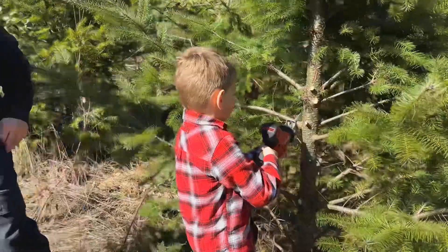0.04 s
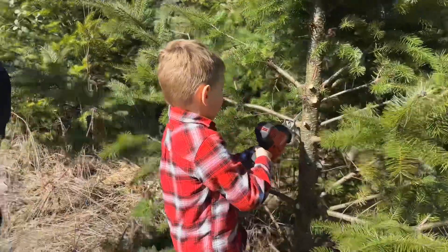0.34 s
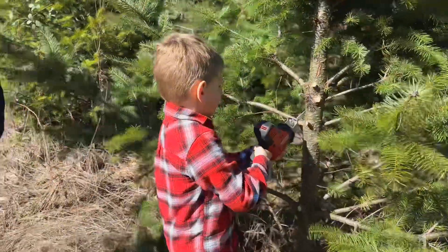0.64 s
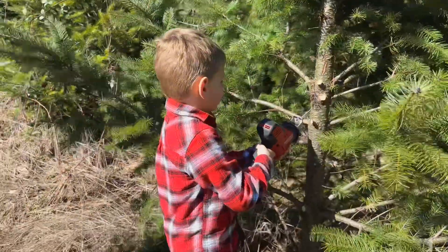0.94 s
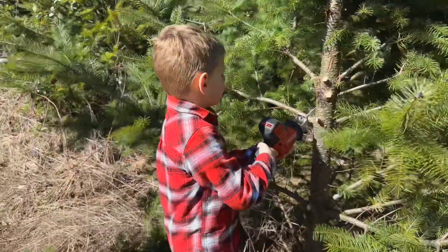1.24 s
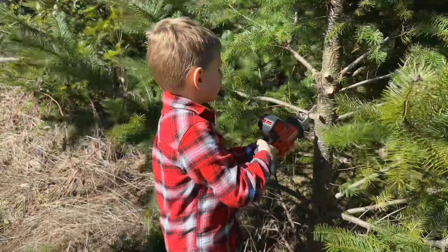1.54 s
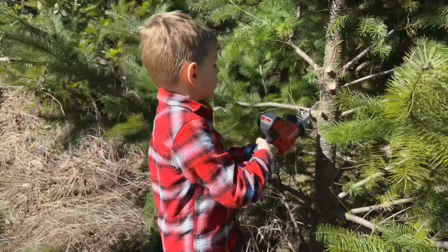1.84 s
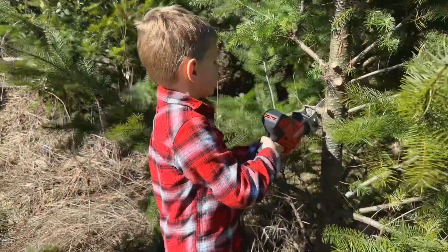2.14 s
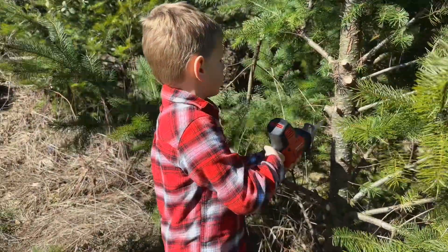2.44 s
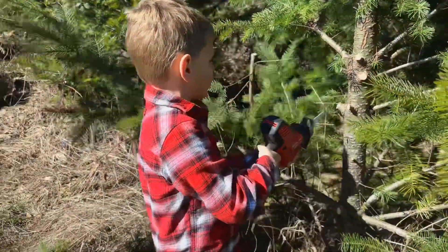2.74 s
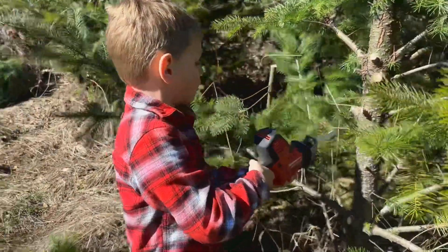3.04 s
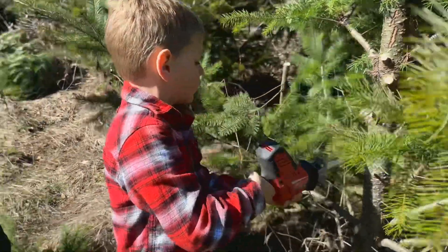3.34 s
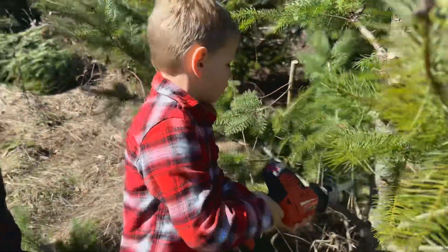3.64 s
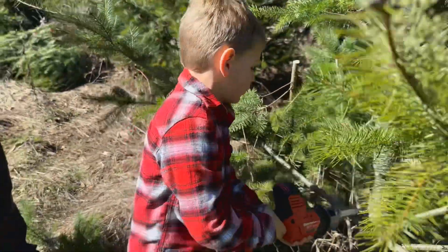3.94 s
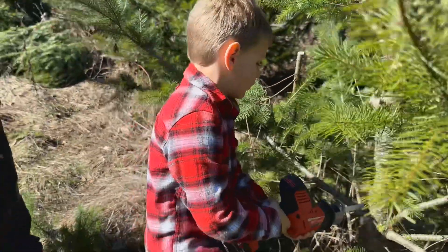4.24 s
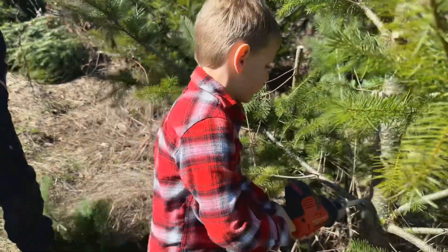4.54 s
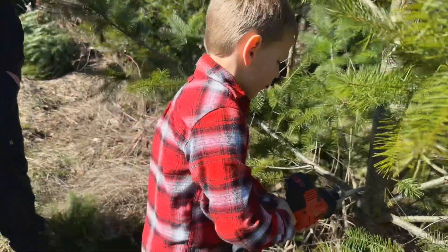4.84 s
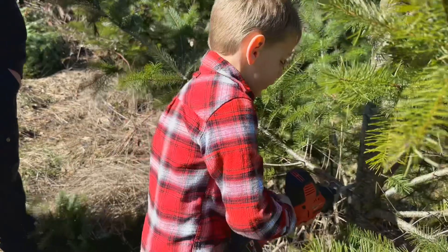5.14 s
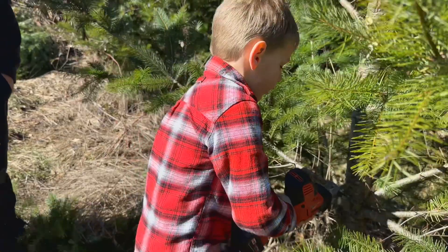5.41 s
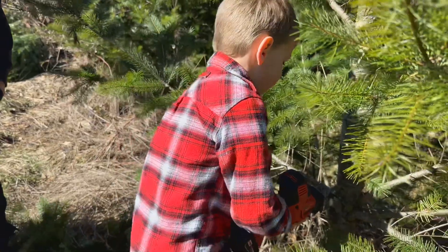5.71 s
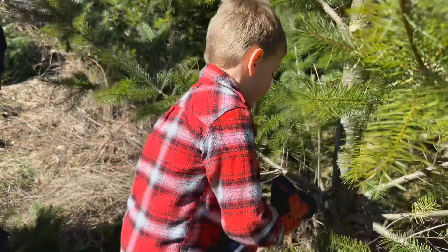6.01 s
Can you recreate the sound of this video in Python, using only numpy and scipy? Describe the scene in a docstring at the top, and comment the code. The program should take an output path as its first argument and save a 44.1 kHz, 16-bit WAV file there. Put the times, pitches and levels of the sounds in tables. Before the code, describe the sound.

A small cordless chainsaw whirs and rattles outdoors, coasts to a stop, then starts again after chain clacks and rustling fir needles.

```python
"""Among fir trees, in light wind, a small cordless chainsaw runs against limbs, coasts to a stop, is
lowered through the needles and starts again. Its slack chain slaps the bar, hardest twice per sprocket
turn, over a rattle of links and a motor hum; the blows ring in the housing. In the pause the loose chain
clacks, the bar rings faintly, needles brush past and something bumps softly near the microphone."""
import sys
import numpy as np
from scipy import signal
from scipy.fft import rfft, irfft, next_fast_len
from scipy.io import wavfile
from scipy.ndimage import map_coordinates

SR = 44100
rng = np.random.default_rng(int(sys.argv[2]) if len(sys.argv) > 2 else 0)


def master_out(mix):
    """Clip the mix to full scale and print it as 16-bit PCM to the path in sys.argv[1]."""
    frames = np.transpose(np.atleast_2d(mix))
    ceiling = np.clip(frames, -1, 1)
    pcm = np.round(ceiling * 32767).astype(np.int16)
    wavfile.write(sys.argv[1], SR, pcm)


N = 267628
TIME = np.arange(N) / SR


def amp(db):
    """Decibels to gain."""
    return 10 ** (np.asarray(db) / 20)


def unit(x):
    """Scaled to rms 1."""
    return x / np.sqrt(np.mean(x ** 2) + 1e-20)


def along(points, hz):
    """Curve of (frequency [Hz], value) points, read on a log frequency axis."""
    knots_hz, values = np.transpose(points)
    return np.interp(np.log(hz + 1), np.log(knots_hz + 1), values)


def wobble(knots_per_s):
    """Smooth random curve."""
    knots = rng.standard_normal(int(N * knots_per_s / SR) + 4)
    return map_coordinates(knots, [TIME * knots_per_s])


def coloured(x, spectrum, resonances=(), size=8192):
    """Minimum-phase filter of unit energy: a broad spectrum plus resonance peaks."""
    hz = np.fft.rfftfreq(size, 1 / SR)
    peaks_db = sum(db / (1 + (2 * (hz - centre) / width) ** 2) for centre, width, db in resonances)
    cepstrum = irfft(np.log(amp(along(spectrum, hz) + peaks_db) + 1e-6))
    cepstrum[1:size // 2] *= 2
    cepstrum[size // 2 + 1:] = 0
    response = irfft(np.exp(rfft(cepstrum)))
    return signal.fftconvolve(x, response / np.linalg.norm(response))[:N]


def lowpass(x, hz, order=1):
    """Butterworth low-pass."""
    return signal.sosfilt(signal.butter(order, hz, fs=SR, output="sos"), x)


def resonant(x, hz, q):
    """One resonance, gain 1 at its centre."""
    return signal.lfilter(*signal.iirpeak(hz, q, fs=SR), x)


def impulses(times_s, sizes):
    """One-sample pushes."""
    samples = np.clip(np.round(times_s * SR).astype(int), 0, N)
    return np.bincount(samples, sizes, N + 1)[:N]


def chatter(times_s, sizes, t60_s):
    """Each contact buzzes in a decaying noise burst with the energy of its push."""
    decay = amp(-120 / (t60_s * SR))
    power = signal.lfilter([1 - decay], [1, -decay], impulses(times_s, sizes ** 2))
    return np.sqrt(power) * rng.standard_normal(N)


def stereo(mid, side):
    """Mid and side to left and right."""
    return np.array([mid + side, mid - side])


def stereo_noise(spectrum, side_db):
    """Coloured stereo noise, rms 1."""
    mid, side = (coloured(rng.standard_normal(N), spectrum) for _ in range(2))
    return unit(stereo(mid, amp(side_db) * side))


# Tree hush: (frequency [Hz], gain [dB])
HUSH_SPECTRUM = [(60, -22), (200, 1), (500, -0.5), (1000, -1.5), (2000, -10), (4000, -13.5), (16000, -17.5)]


def trees():
    """Faint, steady hush of trees."""
    return amp(-67.5) * stereo_noise(HUSH_SPECTRUM, side_db=-6.5)


# Gusts: (time [s], half length [s], level [dB])
GUSTS = [(0.142, 0.16, -55.5), (1.63, 0.29, -54), (2.55, 0.39, -64.5), (3.101, 0.054, -56),
         (3.895, 0.12, -69)]
# Wind common to both microphone ports, and differing between them: (frequency [Hz], gain [dB])
RUMBLE_SPECTRUM = [(15, -15.5), (45, -7.5), (85, 0.5), (140, -4), (220, -19.5), (500, -47.5), (1500, -100)]
EDDY_SPECTRUM = [(20, -29), (60, -18.5), (120, -1), (195, 4.5), (280, -11.5), (600, -22), (1500, -90)]


def wind(breeze_db=-69):
    """Gusts swell over a light breeze at the microphone."""
    gusts = sum(amp(db) * np.exp(-((TIME - at_s) / half_s) ** 2) for at_s, half_s, db in GUSTS)
    rumble = amp(2 * wobble(9.7)) * coloured(rng.standard_normal(N), RUMBLE_SPECTRUM)
    eddies = amp(-2 + 3 * wobble(16)) * coloured(rng.standard_normal(N), EDDY_SPECTRUM)
    return (amp(breeze_db) + gusts) * stereo(rumble, eddies)


# Bumps near the microphone: (time [s], level [dB])
BUMPS = [(2.307, -41), (2.344, -35), (3.057, -52), (3.1, -52), (4.656, -34.5), (4.734, -37), (4.763, -41),
         (4.85, -36)]


def bumps():
    """Each soft bump is one damped low swing, stronger on the left."""
    times_s, db = np.transpose(BUMPS)
    thud_spectrum = [(30, -50), (90, 4), (170, 0), (300, -4.5), (430, -19), (570, -7), (900, -34),
                     (2500, -51), (8000, -81.5)]
    thuds = coloured(impulses(times_s, amp(db + 17)), thud_spectrum)
    return stereo(thuds, side=1.7 * (thuds - lowpass(thuds, 260)))


# Needle hiss: (frequency [Hz], gain [dB])
NEEDLE_SPECTRUM = [(180, -42.5), (300, -16.5), (405, -13.5), (425, -15.5), (870, -6.5), (2480, -8),
                   (9550, -5.5), (16000, -9)]
# Twig flicks: (time [s], level [dB])
TWIG_FLICKS = [(4.39, -35.5), (4.581, -23.5), (4.66, -38), (4.795, -33), (4.834, -32.5)]


def needles(start_s=3.82, peak_s=4.43, settle_db_per_s=18.5, rest_db=-74, ticks_per_s=22):
    """Brushed fir needles hiss and tick in one swell, never quite still; single twigs flick."""
    push = np.clip((TIME - start_s) / (peak_s - start_s), 0, 1) ** 1.4
    swell = push * amp(-53.5 - settle_db_per_s * np.maximum(TIME - peak_s, 0))
    flutter = amp(wobble(30))
    grain = unit(amp(2.5 * wobble(900)) * stereo_noise(NEEDLE_SPECTRUM, side_db=-8))
    hiss = (swell + amp(rest_db)) * flutter * grain
    times_s, db = np.transpose(TWIG_FLICKS)
    flicks = chatter(times_s, amp(db + 9), t60_s=.0065)
    when, strength = rng.random((round(ticks_per_s * N / SR), 2)).T
    ticks = swell * chatter(when * N / SR, amp(15.5) * strength, t60_s=.006)
    snap_spectrum = [(500, -15), (2500, -7), (5500, 5), (13000, 1.5), (16000, -2.5)]
    return hiss + coloured(flicks + ticks, snap_spectrum)


def thicket_echo(x, t60_s, size=8192):
    """Trunks and ground scatter a brief echo, different on each side."""
    age_s = np.arange(size) / SR
    envelope = amp(-60 * age_s / t60_s) * (1 - np.exp(-age_s / .0016))
    tail = envelope * rng.standard_normal((2, size))
    return signal.fftconvolve(x[None], tail / np.linalg.norm(tail[0]), axes=1)[:, :N]


def hand_sway(x, delay_ms, drift_ms, echo_db):
    """A close reflection shifts as the hand moves, changing the treble colour."""
    delay_samples = (delay_ms + drift_ms * wobble(2)) * SR / 1000
    treble = x - lowpass(x, 5900)
    return x + amp(echo_db) * map_coordinates(treble, [np.arange(N) - delay_samples])


# Quadrature side signal at the ports: (frequency [Hz], side over mid [dB])
PORT_SIDE = [(200, -13.5), (700, -23), (1300, -43), (2400, -23.5), (3300, -17.5), (4300, -29),
             (5200, -12.5), (6800, -2.5), (8500, -56.5), (15000, -29.5)]


def port_spread(x):
    """The two microphone ports differ in phase by frequency; the low mids lean right."""
    size = next_fast_len(N + SR // 2)
    hz = np.fft.rfftfreq(size, 1 / SR)
    lean = along([(100, 0), (250, -.09), (700, -.16), (1200, 0), (5000, 0), (8100, .1), (13000, -.05)], hz)
    side_gain = lean + 1j * amp(along(PORT_SIDE, hz))
    return stereo(x, irfft(rfft(x, size) * side_gain, size)[:N])


# Steel bar modes: (frequency [Hz], level [dB], t60 [s])
BAR_MODES = [(2530, -70, .7), (3800, -78, .8), (5220, -74, 1.05), (7730, -80, .7)]


def bar_ring(struck_s=3.612):
    """The bar rings faintly after one clack, each mode wavering."""
    age_s = np.maximum(TIME - struck_s, 0)
    ring = np.zeros(N)
    for hz, db, t60_s in BAR_MODES:
        envelope = amp(db - 60 * age_s / t60_s + 3.3 * wobble(30))
        ring += envelope * np.sin(2 * np.pi * hz * age_s + .85 * wobble(90))
    return (1 - np.exp(-age_s / .01)) * ring


# Switch modes: (frequency [Hz], relative level [dB], t60 [s])
SWITCH_MODES = [(1376, -0.5, 0.03), (1750, -5, .016), (2900, -11.5, 0.013)]


def trigger(click_s=4.862, crack_t60_s=.022):
    """The switch snaps shut just before the restart: a dry crack and a short ring."""
    age_s = np.maximum(TIME - click_s, 0)
    ring = sum(amp(db - 60 * age_s / t60_s) * np.sin(2 * np.pi * hz * age_s)
               for hz, db, t60_s in SWITCH_MODES)
    crack = (age_s > 0) * amp(-5.5 - 60 * age_s / crack_t60_s) * rng.standard_normal(N)
    return amp(-27.5) * (ring + lowpass(crack, 6000))


# Housing and bar resonances: (frequency [Hz], width [Hz], boost [dB])
HOUSING_MODES = [(524.5, 130, 6.5), (752, 270, 8), (1278, 250, 8), (1807, 47, 6), (2226, 380, 2.5),
                 (3556, 175, 8), (4053, 490, 8), (4910, 180, 4.5), (5550, 730, 5.5), (6430, 400, 6),
                 (7990, 410, 5.5), (11600, 330, 6.5)]
# Saw colour at chest height and near the ground: (frequency [Hz], gain [dB])
RAISED_SPECTRUM = [(120, -33), (220, -21), (330, -14.5), (390, -15), (470, -11), (900, -11.5), (1400, -1),
                   (2600, -2), (4000, -9), (5000, -12), (7500, -15), (11000, -13), (13500, -24),
                   (16000, -29.5)]
LOWERED_SPECTRUM = [(120, -44), (220, -27.5), (330, -13), (450, -15.5), (900, -10), (1400, -3.5),
                    (2600, -2.5), (4000, -9), (5000, -11.5), (7500, -17), (11000, -13.5), (13500, -28.5),
                    (16000, -27)]


def housing(force, lowered):
    """The saw body rings under a force; its colour depends on height."""
    at_chest = coloured(force * (1 - lowered), RAISED_SPECTRUM, HOUSING_MODES)
    at_ground = coloured(force * lowered, LOWERED_SPECTRUM, HOUSING_MODES)
    return at_chest + at_ground


# Loose chain clacks: (time [s], level [dB], contact pitch [Hz], contacts [count])
CLACKS = [(2.805, -31, 2400, 1), (2.837, -31, 3060, 1), (2.876, -27.5, 2620, 4), (2.957, -35.5, 1650, 1),
          (3.029, -35, 1810, 2), (3.082, -43, 1700, 1), (3.111, -39, 1580, 1), (3.429, -51.5, 1990, 1),
          (3.522, -50.5, 1990, 1), (3.612, -40, 1480, 1), (3.994, -29.5, 1610, 1), (4.905, -19, 1700, 1)]


def chain_clacks(rebound_s=.012, rebound_loss_db=.7):
    """The slack chain drops on the bar, may rebound, and rings the housing."""
    force = np.zeros(N)
    for first_s, first_db, contact_hz, contacts in CLACKS:
        for k in range(round(contacts)):
            at_s = np.array([first_s + k * rebound_s])
            db = np.array([first_db - k * rebound_loss_db])
            blow = impulses(at_s, amp(db + 1)) + chatter(at_s, amp(db + 13.5), t60_s=.04)
            force += lowpass(blow, 1.78 * contact_hz, order=2) + .18 * resonant(blow, contact_hz, q=3.5)
    return housing(force, lowered=0)


# Trigger held: (pulled [s], released [s], full sprocket speed [turns/s])
MOTOR_RUNS = [(-1, 2.175, 40.19), (4.871, 7, 39.24)]


def motor(spin_up_s=.037, drag_s=.73, friction_turns_per_s2=20.45, taut_s=.087, free_s=.089):
    """Spins up fast, then coasts against viscous drag and steady chain friction."""
    turns_per_s, taut, free = np.zeros((3, N))
    friction = friction_turns_per_s2 * drag_s
    for pulled_s, released_s, full_speed in MOTOR_RUNS:
        age_s = np.maximum(TIME - pulled_s, 0)
        coast_s = np.maximum(TIME - released_s, 0)
        driven = full_speed * (1 - np.exp(-age_s / spin_up_s))
        turns_per_s += np.maximum((driven + friction) * np.exp(-coast_s / drag_s) - friction, 0)
        taut += (age_s > 0) * np.exp(-age_s / taut_s)  # each start tugs the chain tight
        free = np.where(age_s > 0, 1 - np.exp(-coast_s / free_s), free)  # 0 driven, 1 coasting
    return turns_per_s, taut, free


# Motor and gear tones: (multiple of sprocket speed, level raised [dB], level lowered [dB])
HUM_TONES = [(4, -79, -66), (5, -68, -64.5), (6, -67, -69), (7, -60.5, -56.5), (8, -55.5, -50.5),
             (9, -75.5, -50), (10, -62.5, -49), (11, -68, -49.5), (12, -60.5, -50.5), (13, -62.5, -58),
             (14, -51, -56), (15, -57.5, -48), (17, -59.5, -46), (18, -62, -42.5), (19, -53.5, -65.5),
             (20, -52, -57)]


def motor_hum(turns, lowered, waver_rad=.23):
    """Motor and gears hum in slightly unsteady tones locked to the sprocket."""
    tones = np.zeros(N)
    for multiple, raised_db, lowered_db in HUM_TONES:
        phase = 2 * np.pi * (round(multiple) * turns + rng.random()) + waver_rad * wobble(12)
        db = raised_db + (lowered_db - raised_db) * lowered + 1.7 * wobble(9)
        tones += amp(db) * np.sqrt(2) * np.sin(phase)
    return tones


def link_rattle(turns, per_turn, scatter_db):
    """Links and gear teeth tick unevenly; rms 1."""
    timing, strength = rng.standard_normal((int(turns[-1] * per_turn), 2)).T
    times_s = np.interp((np.arange(len(timing)) + .3 * timing) / per_turn, turns, TIME)
    return unit(chatter(times_s, amp(scatter_db * strength), t60_s=.0038))


def groove_slide(turns):
    """The chain slides in the bar groove: a hiss of dense ticks."""
    groove_spectrum = [(500, -6.5), (3000, -2.5), (5200, -4), (6500, -4.5), (8000, -1),
                       (11500, -10.5), (15000, -13.5)]
    return coloured(link_rattle(turns, per_turn=240, scatter_db=-.5), groove_spectrum)


# Slaps within one sprocket turn:
# (position [turns], level raised [dB], level lowered [dB], contact pitch [Hz], jitter [turns])
SLAPS = [(.2, -1.5, -1, 3700, .005), (.25, -9, -8, 2100, .012), (.36, -8, -7, 1400, .015),
         (.72, -12, -18, 1600, .025), (.83, -14, -4, 3700, .012), (.88, -5, -3, 1900, .01),
         (.94, -9, -6, 1200, .015)]


def chain_slaps(turns, lowered, scatter_db=2.1, sharpness_db=6):
    """The chain hits the bar at set points of each turn: a repeating thud, a random buzz; rms 1."""
    force = np.zeros(N)
    whole_turns = np.arange(int(turns[-1]) + 1)
    for position, raised_db, lowered_db, contact_hz, jitter in SLAPS:
        timing, strength, edge = rng.uniform(-1.7, 1.7, (len(whole_turns), 3)).T
        times_s = np.interp(whole_turns + position + jitter * timing, turns, TIME, right=2 * TIME[-1])
        db = raised_db + (lowered_db - raised_db) * np.interp(times_s, TIME, lowered)
        sizes = amp(db + scatter_db * strength)
        thuds = .7 * lowpass(impulses(times_s, sizes), 3600, order=2)
        blows = thuds + chatter(times_s, sizes, t60_s=.014)
        sharpness = np.interp(TIME, times_s, amp(sharpness_db * edge))
        dull = lowpass(blows, 4600)
        force += dull + sharpness * (blows - dull) + 1.26 * resonant(blows, contact_hz, q=1.48)
    return unit(force)


def swelling_ring(force, start_s=.66, full_s=1.65, fade_at_s=2.35, fade_s=.43):
    """A narrow ring near 3.3 kHz swells as the saw is turned, then fades."""
    rise = np.clip((TIME - start_s) / (full_s - start_s), 0, 1)
    swell = rise * np.exp(-np.maximum(TIME - fade_at_s, 0) / fade_s)
    return (amp(-17.5) + amp(2) * swell) * resonant(force, hz=3273, q=20)


def chainsaw(lowered, approach_s=.91, coast_db=-3.5, slap_pace=.22):
    """Slaps and rattle drive bar and housing; more speed gives more and harder blows."""
    turns_per_s, taut, free = motor()
    turns = np.cumsum(turns_per_s) / SR
    pace = turns_per_s / turns_per_s.max()
    # a taut or slow chain hardly slaps; a coasting one strikes softly
    flung = (1 - taut) * (1 - np.exp(-(pace / slap_pace) ** 4)) * amp(coast_db * free)
    slaps = flung * pace ** .75 * chain_slaps(turns, lowered)
    rattle = amp(-1) * pace ** 1.37 * link_rattle(turns, per_turn=36, scatter_db=3.5)
    distance_db = -3 * np.exp(-TIME / approach_s)  # the microphone closes in
    force = amp(-27 + distance_db - .5 * lowered) * (slaps + rattle)
    force += swelling_ring(force)
    # slow blows are softer: the treble dies first
    force = pace ** .12 * force + (1 - pace ** .5) * lowpass(force, 4000)
    slide = amp(-48.5) * pace ** .19 * groove_slide(turns)
    hum = amp(-1) * pace ** 3.6 * motor_hum(turns, lowered)
    return housing(force, lowered) + slide + hum


def scene(lower_at_s=3.5, lower_takes_s=1):
    """The saw is ahead, among trees, and drifts slightly right as it is lowered."""
    lowered = np.clip((TIME - lower_at_s) / lower_takes_s, 0, 1)  # 0 chest height, 1 near the ground
    saw = chainsaw(lowered) + chain_clacks() + trigger() + bar_ring()
    saw = hand_sway(saw, delay_ms=.6145, drift_ms=.025, echo_db=-13)
    pan_db = .2 - .75 * lowered  # left minus right
    direct = port_spread(saw) * amp([pan_db / 2, -pan_db / 2])
    echo = amp(-18.5) * thicket_echo(saw, t60_s=.23)
    return direct + echo + needles() + bumps() + wind() + trees()


def record(dry, ceiling=.8, top_hz=16050):
    """Soft peak limiting, then a sharp band limit."""
    rounded = dry / (1 + np.abs(dry / ceiling) ** 4) ** .25
    size = next_fast_len(N + SR // 2)
    passband = np.fft.rfftfreq(size, 1 / SR) < top_hz
    return irfft(rfft(rounded, size) * passband, size)[:, :N]


dry = scene()
out = record(dry)
master_out(out)
```